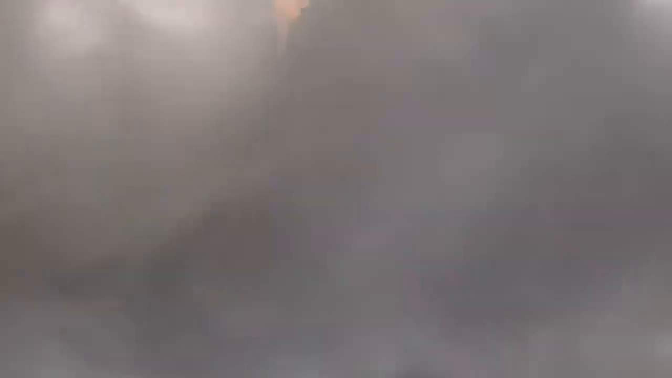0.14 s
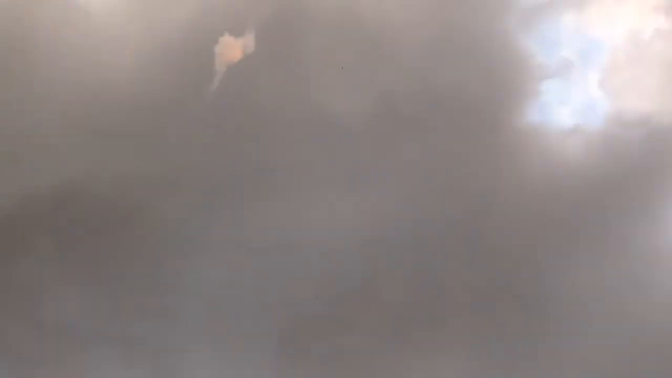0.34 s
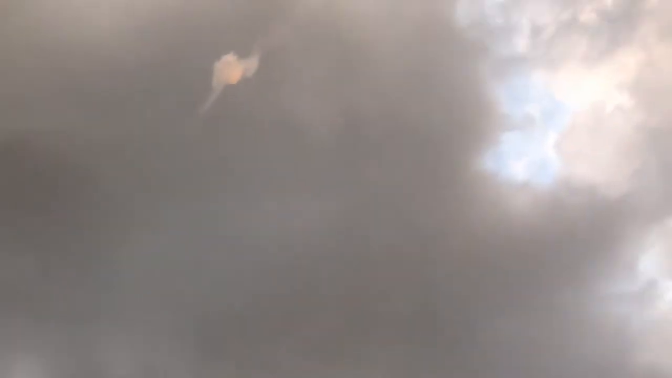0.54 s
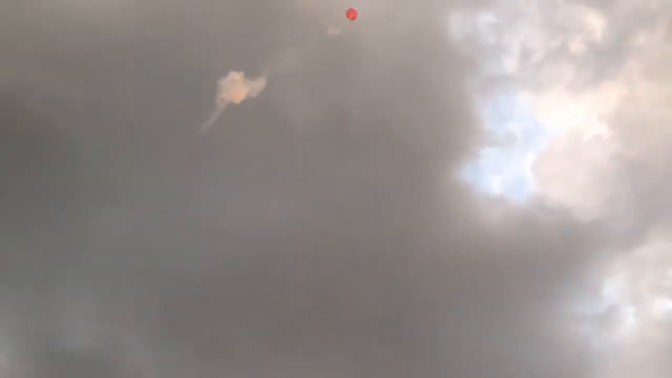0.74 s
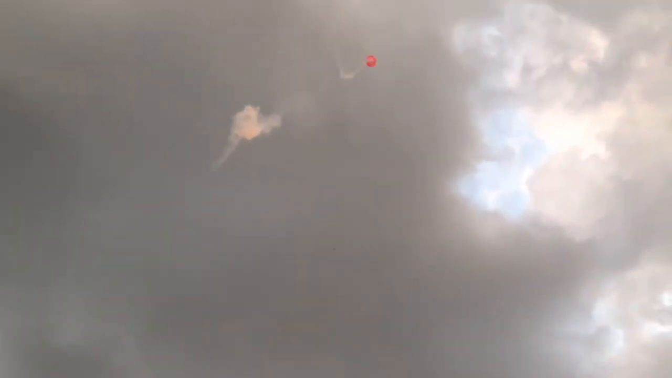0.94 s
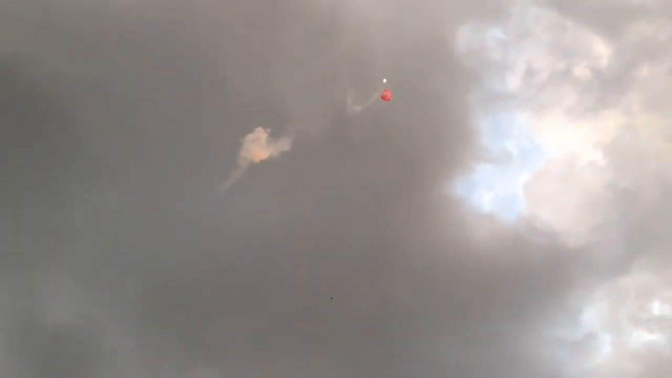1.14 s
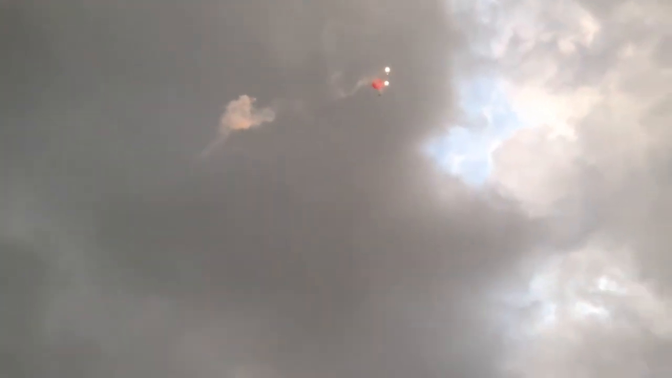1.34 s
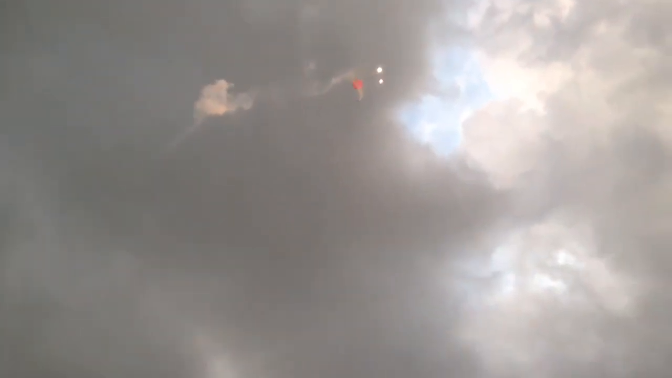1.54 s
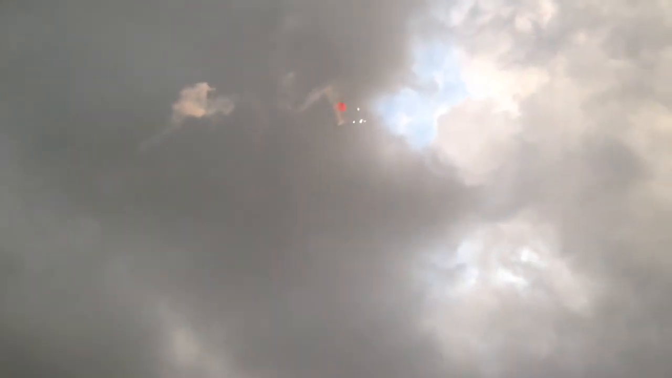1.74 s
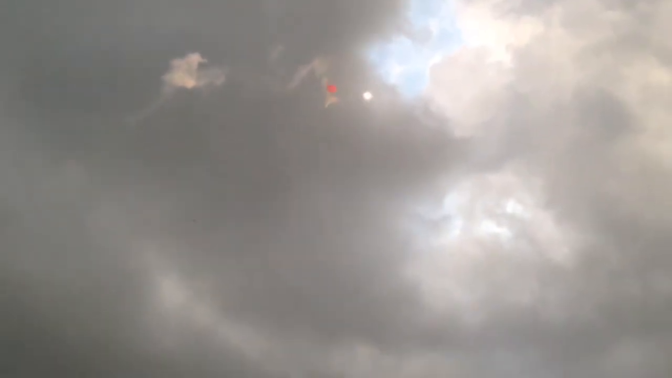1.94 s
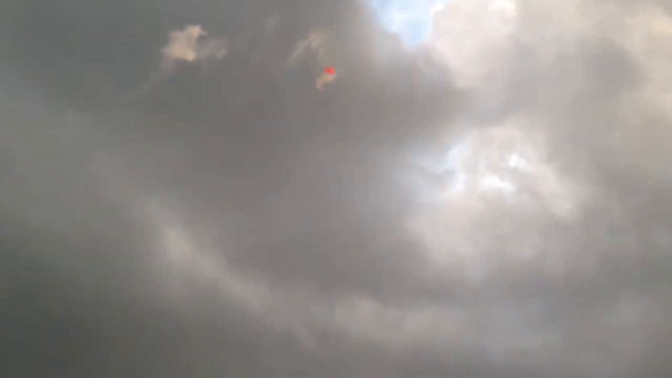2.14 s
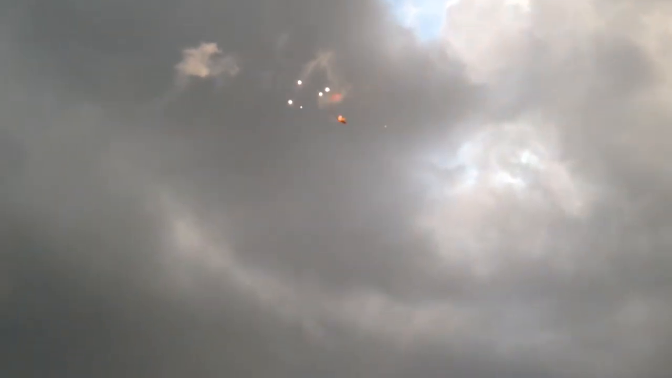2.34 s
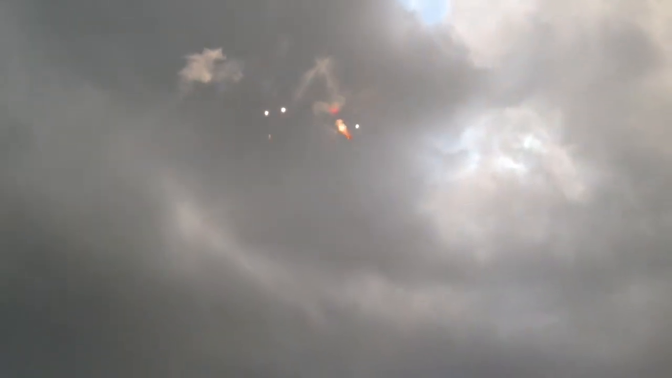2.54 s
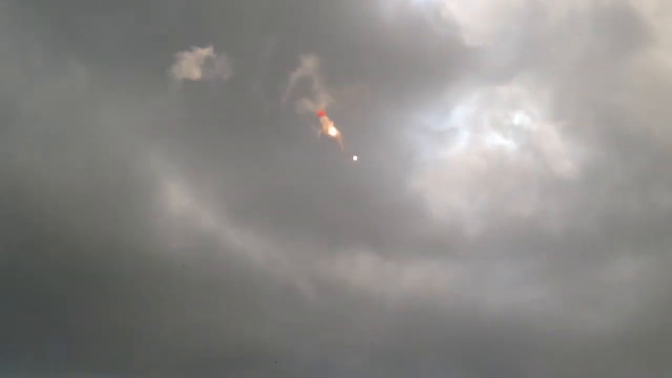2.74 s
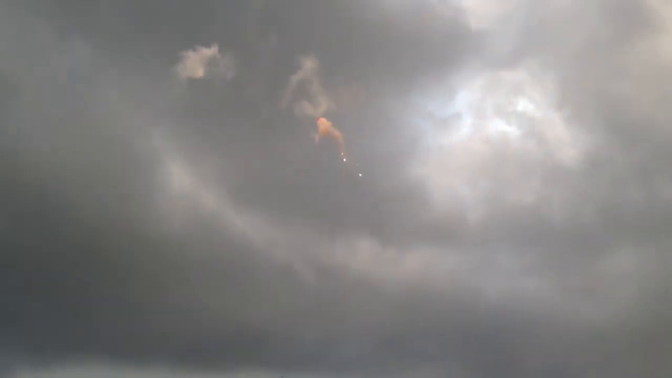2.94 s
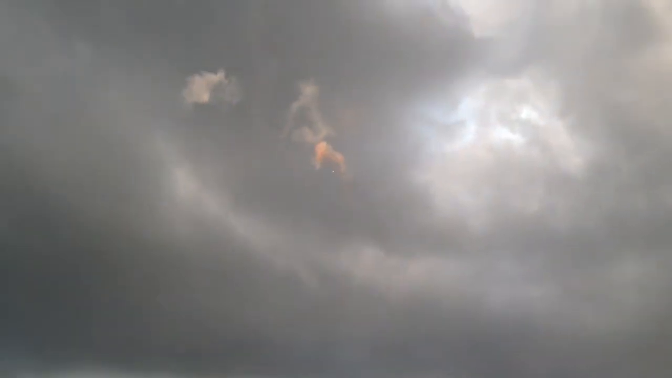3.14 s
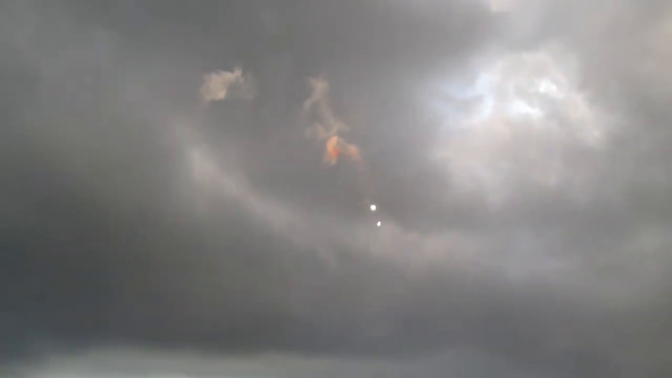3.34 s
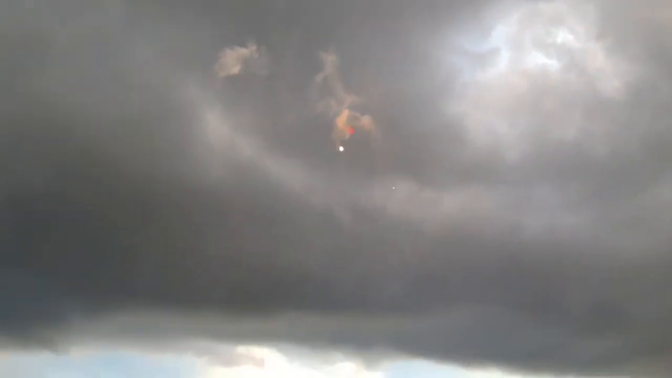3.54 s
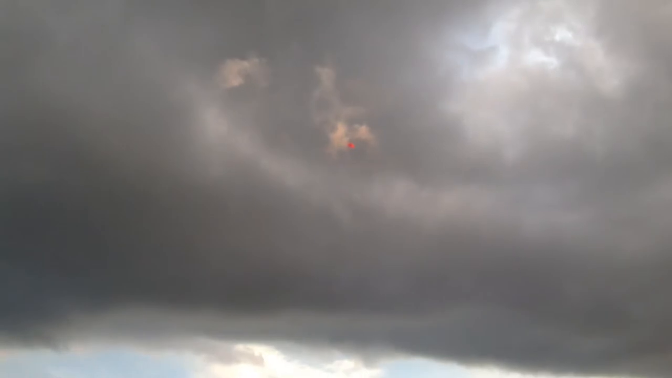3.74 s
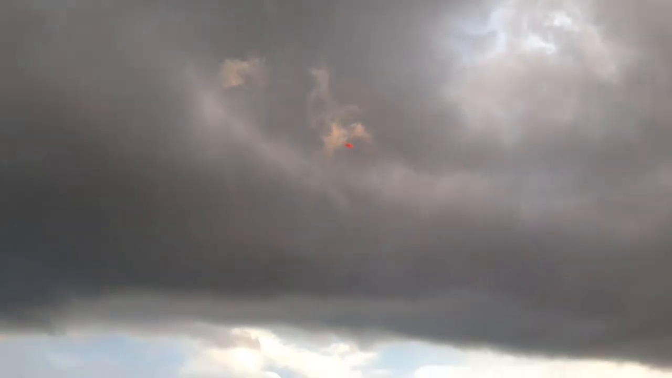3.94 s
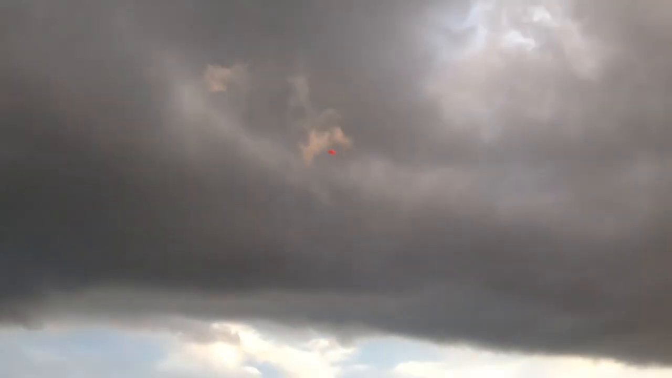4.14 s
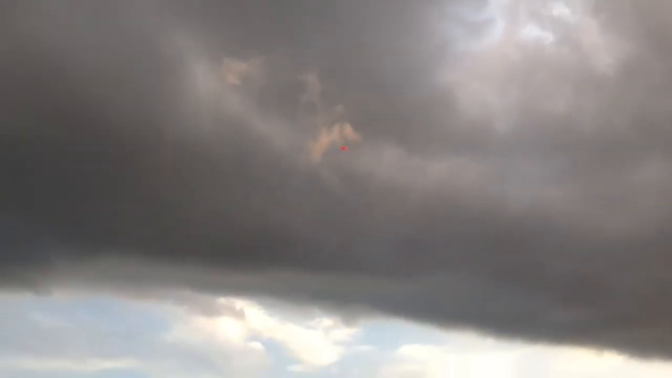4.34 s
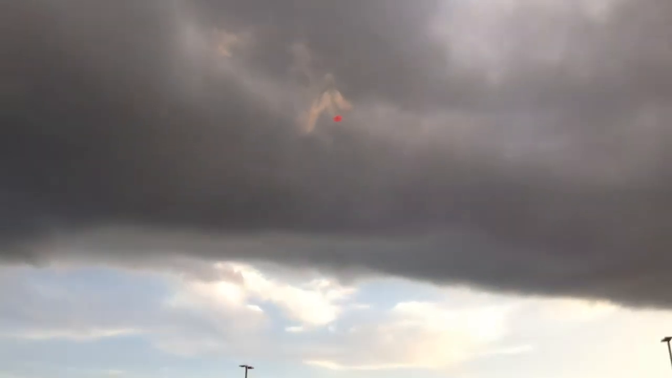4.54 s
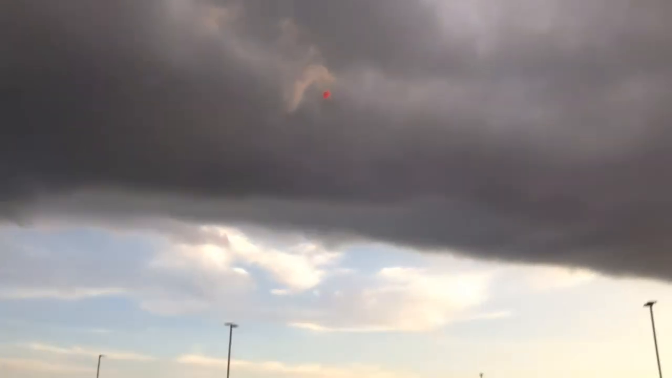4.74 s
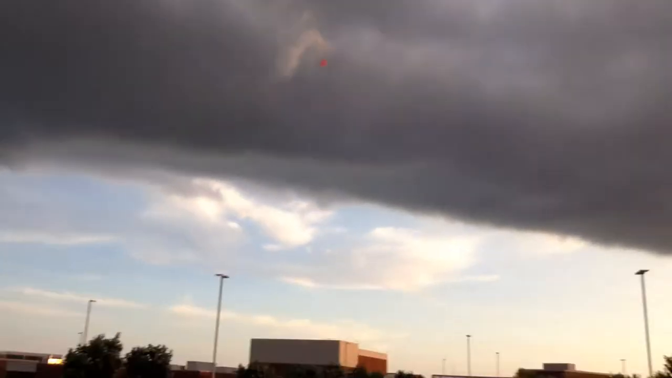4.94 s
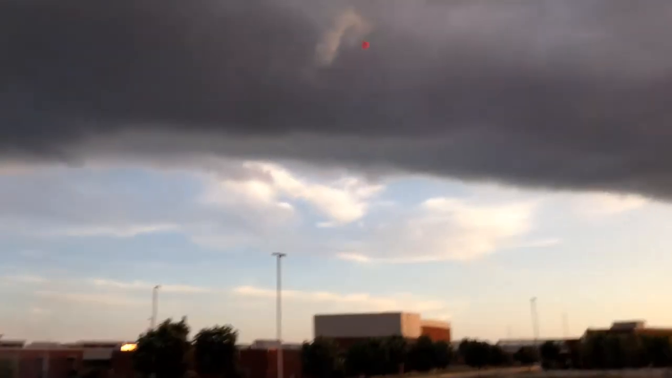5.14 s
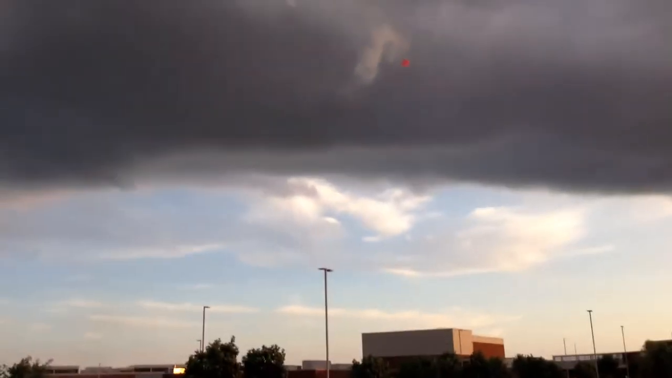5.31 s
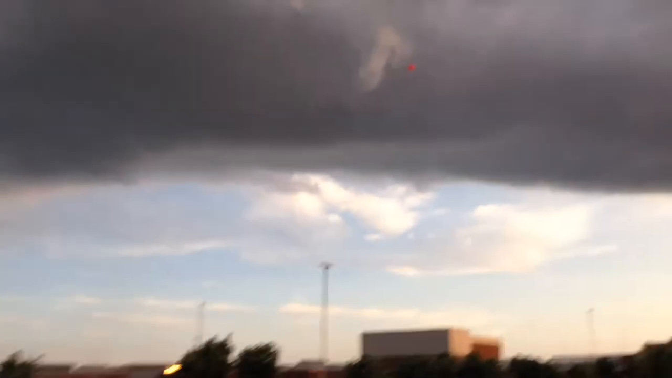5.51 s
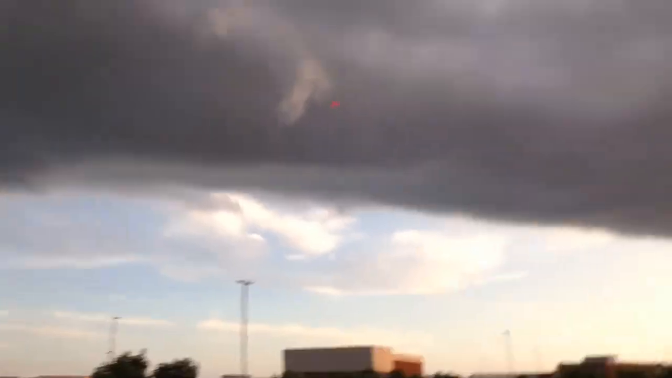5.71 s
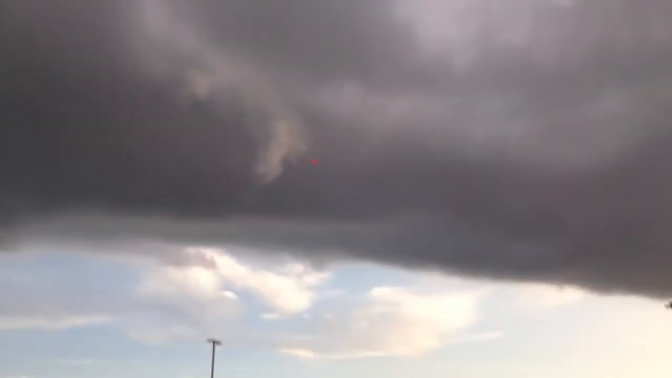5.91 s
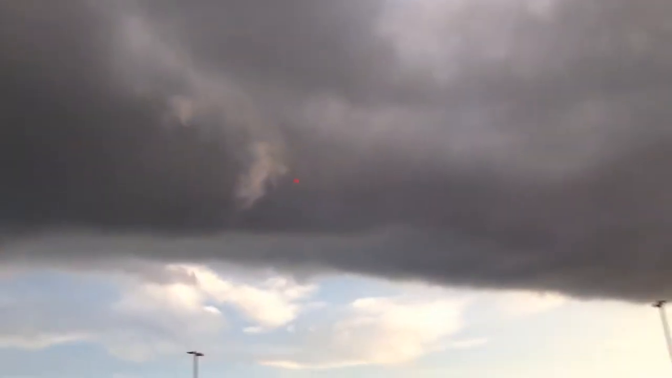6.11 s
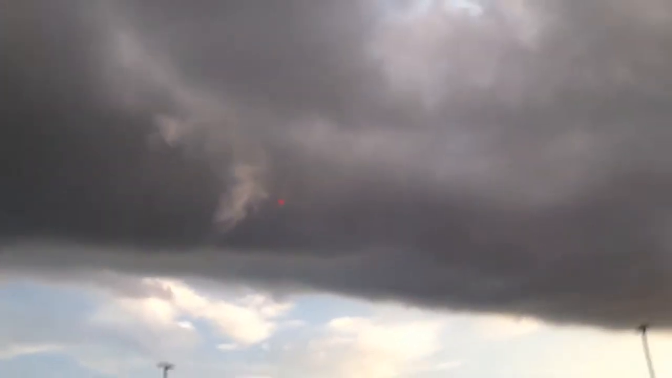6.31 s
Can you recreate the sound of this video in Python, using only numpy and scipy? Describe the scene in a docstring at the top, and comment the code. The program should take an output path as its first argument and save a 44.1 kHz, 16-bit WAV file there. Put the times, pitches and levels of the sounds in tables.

```python
"""A breeze gusts on the microphone over still air with a brief thin hiss, and the first single pops are heard.
A crackling firework star is falling from high in a daytime sky. Leaves stir, a hand rustles, a hollow thing knocks.
The pops thicken into a dense crackle, then thin to stragglers; at the end a dull, distant crackle joins in.
Each pop is a tiny shock wave that arrives directly and again off the ground, and scatters over open land.
Wind, leaves, rustles and air are coloured noise with moving levels; the knock is a few fading tones and a crack."""
import sys
import numpy as np
from scipy import signal
from scipy.fft import rfft, irfft, next_fast_len
from scipy.io import wavfile
from scipy.ndimage import uniform_filter1d, minimum_filter1d

SR = 44100
rng = np.random.default_rng(int(sys.argv[2]) if len(sys.argv) > 2 else 0)


def int16_out(signal):
    """Quantize to a 16-bit WAV file."""
    q = np.round(np.clip(np.atleast_2d(signal).T, -1, 1) * 32767)
    wavfile.write(sys.argv[1], SR, q.astype(np.int16))


N = 280913
TIME = np.arange(N) / SR  # seconds

# how thickly the weak pops swarm: [t/s, rate/(pops per s), mean energy/dB]
WEAK_SWARM = [(1.1, 2, -30), (1.3, 41, -18), (1.8, 47, -25.5), (2.1, 259, -17), (2.5, 292, -11),
              (2.9, 446, -12), (3.23, 510, -19.5), (3.3, 127, -11), (3.45, 55, -14), (3.8, 22, -17),
              (4.3, 15, -27.5), (5.55, 1.75, -38.5)]


def undb(db):
    """Turn decibels into gain."""
    return 10 ** (np.asarray(db) / 20)


def along(table, t):
    """Read the columns of a table at times t, with straight lines between its rows."""
    s, *columns = np.transpose(table)
    return [np.interp(t, s, c) for c in columns]


def shape(points, hz):
    """Read a table of [f/Hz, value] on a log-frequency axis."""
    f, value = np.transpose(points)
    return np.interp(np.log(np.maximum(hz, 1)), np.log(f), value)


def tint(x, colour):
    """Filter a signal to a colour, [f/Hz, level/dB], and scale it to an rms of 1."""
    size = next_fast_len(len(x), True)
    gain = undb(shape(colour, np.fft.rfftfreq(size, 1 / SR)))
    y = irfft(rfft(x, size) * gain, size)[:len(x)]
    return y / np.sqrt(np.mean(y ** 2))


def walk(rate):
    """Wander by chance around 0: random points, `rate` per second, joined by straight lines."""
    knots = rng.standard_normal(1024)
    return np.interp(TIME * rate, np.arange(len(knots)), knots)


def unit(rows):
    """Scale each row to an energy of 1."""
    return rows / np.sqrt(np.sum(rows ** 2, axis=-1, keepdims=True))


def place(times, waves):
    """Add each wave to silence at its own time."""
    out = np.zeros(N + waves.shape[1])
    starts = np.clip(times * SR, 0, N - 1).astype(int)
    for i, wave in zip(starts, waves):
        out[i:i + len(wave)] += wave
    return out[:N]


def swells(rows):
    """Gain over time of smooth bell-shaped swells: [centre t/s, level/dB, half length/s]."""
    return sum(undb(db) * np.exp(-((TIME - s) / length) ** 2) for s, db, length in rows)


def grit(size, spread_db):
    """Dense noise grains of very uneven strength."""
    return rng.standard_normal(size) * undb(spread_db * rng.standard_normal(size))


def air():
    """Still outdoor air: steady soft noise, with a thin high hiss that holds at first, then dies away."""
    # colour of the still air: [f/Hz, level per Hz/dB]
    air_colour = [(30, 2), (70, 5.5), (150, -1.5), (400, -6), (1000, 1), (2000, -5), (5000, -9),
                  (6200, -19.5), (10000, -18), (15000, -29.5)]
    hiss_colour = [(6000, -33.5), (7700, -1), (9200, 1), (11500, -12.5), (14000, -8.5)]
    air_db, hiss_db = -58, -62
    hiss_hold_s, hiss_fade_db_per_s = .17, 90
    calm = tint(rng.standard_normal(N), air_colour) * undb(air_db + 0.56 * walk(5))
    hiss = tint(rng.standard_normal(N), hiss_colour)
    fade_db = hiss_fade_db_per_s * np.maximum(TIME - hiss_hold_s, 0)
    return calm + hiss * undb(hiss_db - fade_db)


def wind():
    """Eddies rumble on the microphone; strong gusts reach higher, and single buffets thump with a rough edge."""
    # the breeze, which mostly dies down: [t/s, level/dB]
    breeze = [(0, -37), (.8, -37), (1.2, -41), (2.1, -42.5), (2.8, -59), (3.5, -62), (4.5, -55.5),
              (6.37, -58)]
    # gusts on top of it: [centre t/s, level/dB, half length/s]
    gusts = [(.02, -30, .05), (.228, -31.5, 0.038), (.38, -33.5, .04), (.585, -27.5, 0.073),
             (.74, -27.5, 0.081), (.9, -31, 0.023), (1.13, -41, 0.02), (1.32, -31.5, 0.051),
             (1.51, -32, 0.017), (1.6, -34.5, .04), (1.86, -40, 0.041), (3.79, -46.5, 0.031),
             (4.62, -44, 0.026), (4.86, -47.5, .025), (5.02, -50, .035), (5.13, -49.5, 0.035),
             (5.25, -44, 0.053), (5.5, -45.5, .03), (6.185, -41, 0.041)]
    # colour of the rumble: [f/Hz, level/dB]
    rumble_colour = [(25, -7.5), (60, -11.5), (100, -7.5), (170, 1.5), (260, -3.5), (400, -19),
                     (700, -31.5), (1500, -50.5), (4000, -65)]
    # single buffets, levels before the mix: [t/s, level/dB, pitch f/Hz]
    buffets = [(.003, -16.5, 280), (0.187, -25, 200), (0.242, -17.5, 230.5), (0.326, -16.5, 193),
               (0.576, -18.5, 260), (.71, -12, 330), (.728, -12, 199), (.755, -15.5, 287),
               (1.035, -21, 204), (1.495, -25, 180), (2.173, -17, 225), (2.309, -19, 235),
               (5.508, -25, 220), (5.789, -32.5, 181), (6.17, -28, 235.1)]
    rush_colour = [(120, -40.0), (330, 7.5), (550, -2.5), (1000, -20.0), (3000, -47.5), (9000, -58)]

    gust_db = 20 * np.log10(np.hypot(undb(along(breeze, TIME)[0]), swells(gusts)))
    rumble = tint(rng.standard_normal(N), rumble_colour) * undb(gust_db - 1.0 + 3.5 * walk(35))
    strength = undb(gust_db - gust_db.max() + 3.3 * walk(45))
    rush = tint(rng.standard_normal(N), rush_colour)

    times, db, hz = np.transpose(buffets)[:, :, None]
    cycles = hz * TIME[:SR // 16]
    swell = cycles / 0.49  # the push peaks after about half a cycle
    push = undb(db) * swell * np.exp(1 - swell)
    thumps = place(times[:, 0], push * np.sin(2 * np.pi * cycles))
    edge = undb(-17.5) * place(times[:, 0], push)
    # the power above 1 makes the rush stand out in strong gusts
    rush_gain = undb(-35) * strength ** 1.85 + edge
    return rumble + rush_gain * rush + undb(-2.5) * thumps


def shocks(colour, tilt_db, size=512):
    """Tiny shock waves that start sharply, with their energy up front; each has its own tilt in dB per octave."""
    hz = np.fft.rfftfreq(size, 1 / SR)
    octaves = np.log2(np.maximum(hz, 700) / 3000)  # the tilt turns about 3 kHz and stops below 700 Hz
    db = shape(colour, hz) + tilt_db[:, None] * octaves
    cepstrum = irfft(np.log(undb(db)))
    cepstrum[:, 1:size // 2] *= 2  # folding puts no sound before the start of the wave
    cepstrum[:, size // 2 + 1:] = 0
    return unit(irfft(np.exp(rfft(cepstrum))))


def flutter(colour, count, t60, size=1536):
    """Short bursts of tiny reflections, different for each pop; t60 is the time to fade by 60 dB, in s."""
    noise = tint(rng.standard_normal(count * size), colour).reshape(count, size)
    return unit(noise * undb(-60 * np.arange(size) / SR / t60))


def pops(times, db, flutter_db, t60):
    """Shock waves, no two equally bright, each trailed by its flutter."""
    # colour of a pop: [f/Hz, level/dB]
    pop_colour = [(40, -29.5), (150, -19.5), (450, -8.5), (1000, -5), (2000, -0.5), (3000, -2), (4400, 0.5),
                  (7000, -3.5), (8000, -6.5), (9800, -4), (12500, -10), (15000, -21), (16500, -42)]
    # colour of the flutter behind it: [f/Hz, level/dB]
    flutter_colour = [(60, -27.5), (300, -6.5), (800, -2.5), (1800, 7.5), (3200, 1.5), (6500, 1),
                      (10000, -1), (15000, -10.5)]
    # pops grow duller as the stars fall; the last small ones are thin and bright: [t/s, tilt/(dB per octave)]
    brightness = [(.5, 3.5), (1.15, .5), (1.5, 0), (4.3, -0.03), (4.6, 2), (5.5, 2.5)]
    size = undb(db)[:, None]
    tilt_db = along(brightness, times)[0] + 0.99 * rng.standard_normal(len(times))
    spikes = place(times, size * shocks(pop_colour, tilt_db))
    trails = place(times, size * flutter(flutter_colour, len(times), t60))
    return spikes + undb(flutter_db) * trails


def firework():
    """Loud and weak pops, each heard directly and once more off the ground, which takes a longer path."""
    # pops that stand out, alone or above the crackle, before the mix: [t/s, energy/dB]
    loud_pops = [(.1458, -22.5), (.3774, -8.5), (.5066, -22), (.5348, -10.5), (.547, -14), (.5576, -10),
                 (.6099, 2.5), (.6125, 7), (.7209, 0.5), (.7675, 2), (.9094, 6), (.9403, 3.5), (1.1091, -7),
                 (1.1189, -3.5), (1.1553, 1), (1.1814, 1), (1.2145, 4), (1.2173, 4.5), (1.241, -9),
                 (1.2641, 6), (1.2797, -2), (1.2933, -1.5), (1.2947, 9), (1.3239, 8), (1.3364, 0.5),
                 (1.3441, 10), (1.3886, 4), (1.433, 4), (1.442, 8), (1.4445, 1.5), (1.4508, 3.5),
                 (1.485, -2), (1.518, 4.5), (1.5408, 2.5), (1.5454, 15), (1.5523, 2.5), (1.5633, 2.5),
                 (1.5865, 8.5), (1.5957, 4), (1.5987, 6.5), (1.6088, 14), (1.6188, 10), (1.6253, 8.5),
                 (1.6377, 8.5), (1.675, 1.5), (1.6805, 2.5), (1.7165, -4.5), (1.7603, 6), (1.7629, 7),
                 (1.785, -3), (1.7913, 1.5), (1.8366, 1.5), (1.8402, 8), (1.8581, 2.5), (1.8666, 1.5),
                 (1.8828, 1), (1.8997, 6), (1.9183, 6), (1.9479, 9.5), (1.9698, 9), (1.9772, 6),
                 (2.0017, 6.5), (2.0371, 10.5), (2.0658, 4), (2.1033, 10), (2.1168, 10.5), (2.1182, 8.5),
                 (2.1211, 6), (2.1448, 10), (2.1598, 9), (2.1692, 7.5), (2.1853, 8.5), (2.1971, 7),
                 (2.2516, 4.5), (2.2737, 6.5), (2.2841, 10.5), (2.2897, 11), (2.3079, 11), (2.3552, 9.5),
                 (2.3699, 8.5), (2.3936, 4.5), (2.4377, 10.5), (2.4588, 11.5), (2.5213, 3), (2.5621, 5),
                 (2.567, 5), (2.5977, 6.5), (2.6062, 7), (2.6117, 8.5), (2.6517, 6.5), (2.7412, 7.5),
                 (2.7494, 4), (2.8159, 6.5), (2.8283, 9), (2.8407, 17), (2.9013, 17), (2.905, 8.5),
                 (2.9085, 11.5), (2.9205, 9), (2.9313, 7), (2.9571, 11), (2.9614, 4), (2.9687, 4),
                 (3.0344, 11), (3.0522, 9), (3.0867, 5.5), (3.0911, 6.5), (3.1193, 9), (3.1581, 4),
                 (3.1609, 1.5), (3.1677, 17), (3.1701, 11.5), (3.1741, 8), (3.1812, 6.5), (3.1977, 15),
                 (3.2314, 8.5), (3.2439, 8.5), (3.2488, 9.5), (3.2588, 6.5), (3.2884, 6.5), (3.293, -2.5),
                 (3.3092, 6), (3.3248, 9.5), (3.3281, 6), (3.3309, 13.5), (3.3332, 10), (3.336, 6.5),
                 (3.3543, 4.5), (3.3777, -7), (3.4182, -.5), (3.4317, 7.5), (3.4447, -7), (3.4683, 4.5),
                 (3.4755, 7.5), (3.4784, 1), (3.4897, -1), (3.5453, -1), (3.6196, 0.5), (3.6477, 3),
                 (3.6524, 4), (3.6694, 7.5), (3.701, 7), (3.7142, 3.5), (3.7501, 12), (3.7671, -2.5),
                 (3.8311, 5.5), (3.9357, 6), (4.0882, 8.5), (4.3018, 2), (4.5178, 3), (4.5699, -18),
                 (4.7997, -26.5), (5.0326, -20), (5.1493, -30), (5.2132, -19.5), (5.2852, -18),
                 (5.3197, -15), (5.4297, -14), (5.4865, -21)]
    # bounce off the ground, mostly sooner as the stars sink: [t/s, delay/s, level/dB]
    ground = [(.6, .011, -15.5), (1.2, .011, -6), (2.2, 0.0087, -7), (3.0, 0.0078, -6), (3.6, 0.006, -6.5),
              (4.3, .0053, -1.5), (4.52, .0038, -3), (5.3, 0.0038, -14)]

    rate, mean_db = along(WEAK_SWARM, TIME)
    weak = np.flatnonzero(rng.random(N) < rate / SR)
    weak_db = mean_db[weak] + 5.0 * rng.standard_normal(len(weak))
    weak_pops = np.column_stack([TIME[weak], weak_db])
    times, db = np.vstack([loud_pops, burst(), weak_pops]).T
    # each pop falls a tiny random step off its listed time, so the timing stays irregular
    times = times + 4e-5 * rng.standard_normal(len(times))

    delay, bounce_db = along(ground, times)
    # in the thick of it the stars are spread out, so their bounces differ
    crowding = along(WEAK_SWARM, times)[0] / rate.max()
    delay = delay * (1 + .06 * crowding * rng.standard_normal(len(times)))
    direct = pops(times, db, flutter_db=-10.5, t60=0.0085)
    bounce = pops(times + delay, db + bounce_db, flutter_db=-8.5, t60=0.012)
    # rough ground swallows the top
    dull_bounce = signal.lfilter(*signal.butter(2, 7200, fs=SR), bounce)
    return undb(0.64) * direct + undb(1.5) * dull_bounce


def land(x, wet_db):
    """Grainy scatter from lots and buildings: a noise tail whose bands each fade at their own pace."""
    # bands of the scatter, t60 being the time to fade by 60 dB: [centre f/Hz, level/dB, t60/s]
    scatter_bands = [(250, -16, 1.5), (693, 2.5, 2.0), (1500, -6, 5), (3040, -3, 5), (4800, -1, 3.57),
                     (6550, 1, 2.8), (8500, 5.5, 1.4), (13000, -3, 1.9)]
    t = TIME[:3 * SR]
    hz = np.fft.rfftfreq(len(t), 1 / SR)
    grains = rfft(grit(len(t), spread_db=4))
    centres = np.transpose(scatter_bands)[0]
    tail = 0
    # each band's share is 1 at its own centre and 0 at its neighbours'
    for (_, db, t60), share in zip(scatter_bands, np.eye(len(scatter_bands))):
        band = irfft(grains * shape(np.column_stack([centres, share]), hz))
        tail = tail + band * undb(db - 60 * t / t60)
    return signal.fftconvolve(x, undb(wet_db) * unit(tail))[:N]


def fizz(crackle):
    """Where the pops crowd together, countless tiny grains burn with them and merge."""
    colour = [(150, -23.5), (500, -9), (1000, -3.5), (1800, -3.0), (3000, -2.5), (5000, -4.5),
              (7000, -1.5), (9000, -10.0), (15000, -11)]
    rate = along(WEAK_SWARM, TIME)[0]
    # strength of the crackle over 1/80 s
    activity = np.sqrt(np.abs(uniform_filter1d(crackle ** 2, size=SR // 80)))
    grains = tint(grit(N, spread_db=6.0), colour)
    return undb(-13.5) * activity * (rate / rate.max()) ** .5 * grains


def leaves():
    """Leaves stirred by the first gusts: uneven noise grains in one soft papery swell."""
    colour = [(200, 1.0), (800, 7), (1500, 6.0), (3000, -18.0), (6000, -25.5), (14000, -22.0)]
    centre_s, level_db, half_length_s = 0.47, -54.5, 0.17
    swell = swells([(centre_s, level_db, half_length_s)])
    return swell * undb(2 * walk(24.3)) * tint(grit(N, spread_db=6), colour)


def rustle():
    """The hand that holds the phone rustles softly: fine bright friction grains in short swells."""
    # the rustles: [centre t/s, level/dB, half length/s]
    hand_moves = [(0.564, -40, 0.012), (.78, -56, 0.057), (4.615, -46, 0.032), (5.273, -59, 0.049),
                  (5.434, -57, 0.054), (6.167, -48, 0.01)]
    # their colour: [f/Hz, level/dB]
    friction_colour = [(200, -13), (1000, -14), (4000, 5), (6500, -1.5), (9500, -3), (12500, -9),
                       (16000, -20)]
    return swells(hand_moves) * tint(grit(N, spread_db=7.5), friction_colour)


def knock():
    """A hollow thing near by is struck once: a short crack of noise and a brief ring of fading tones."""
    # what it rings with, t60 being the time to fade by 60 dB: [f/Hz, level/dB, t60/s]
    modes = [(542, 2, 0.064), (723, -6, .015), (1080, -19, 0.017), (1518, -6, 0.016), (1600, -11, 0.031)]
    crack_colour = [(250, -13.5), (800, 6), (1800, -1), (3000, -9), (5000, -12), (9000, -17), (15000, -30)]
    knock_s, knock_db = .8668, -16.5
    t = TIME[:SR // 5]
    ring = sum(undb(db - 60 * t / t60) * np.sin(2 * np.pi * hz * t) for hz, db, t60 in modes)
    crack = tint(rng.standard_normal(len(t)), crack_colour) * undb(-3.5 - 60 * t / 0.019)
    return undb(knock_db) * place(np.array([knock_s]), (ring + crack)[None])


def burst():
    """Strong pops at uneven gaps, ever faster as the fire spreads through the star: rows [t/s, energy/dB]."""
    # the height of the burn, when full-strength pops come too fast to tell apart
    start_s, end_s = 1.9, 3.26
    first_per_s, last_per_s = 45, 80
    mean_db, spread_db = 2.2, 3.0
    rate = np.interp(TIME, [start_s, end_s], [first_per_s, last_per_s], left=0, right=0)
    burnt = np.cumsum(rate) / SR  # number of pops due so far
    late, strength = rng.standard_normal((int(burnt[-1]), 2)).T
    turn = np.clip(np.arange(len(late)) + .5 + .7 * late, .5, burnt[-1] - .5)
    times = TIME[np.searchsorted(burnt, turn)]
    return np.column_stack([times, mean_db + spread_db * strength])


def far_crackle():
    """Pops dulled and smeared by distance, each in a patter of weaker ones that builds and fades."""
    # distant pops, before the mix: [t/s, energy/dB]
    distant_pops = [(5.184, -15), (5.194, -11.5), (5.316, -16.5), (5.43, -17.5), (5.524, -18), (5.541, -15),
                    (5.661, -15), (5.856, -21.5), (5.873, -23), (5.878, -13), (5.901, -35), (5.963, -14),
                    (6.162, -15.5), (6.174, -19), (6.193, -15), (6.303, -13)]
    # their dull colour: [f/Hz, level/dB]
    distant_colour = [(100, -22), (350, 1), (700, 4.5), (1900, -4.5), (2800, -17.5), (5000, -25),
                      (9000, -40), (15000, -40)]
    patter_db, build_s, fade_s = -36.5, 0.029, 0.099
    times, db = np.transpose(distant_pops)
    size = undb(db)[:, None]
    spikes = place(times, size * shocks(distant_colour, 0.53 * rng.standard_normal(len(times))))
    smear = place(times, size * flutter(distant_colour, len(times), t60=0.027))

    # about 600 grains per second over a faint steady noise
    grains = (rng.random(N) < 600 / SR) * grit(N, spread_db=3.5) + undb(-23) * rng.standard_normal(N)
    since = TIME - times[:, None]
    activity = np.max(size * np.exp(-np.maximum(since / fade_s, -since / build_s)), axis=0)
    patter = undb(patter_db) * activity * tint(grains, distant_colour)
    return undb(-5.0) * spikes + undb(-4.0) * smear + patter


def scene():
    """The firework and its wavering scatter over open land, with wind, small sounds and a distant crackle."""
    around = air() + wind() + leaves() + rustle() + knock() + far_crackle()
    crackle = firework()
    scatter = undb(1.0 * walk(14)) * land(crackle, wet_db=-22.5)
    return (crackle + fizz(crackle) + scatter + around)[None]


def record(dry):
    """A fast limiter catches the biggest spikes and the rest of their tips clip; deep bass and top are cut."""
    needed = np.minimum(1, 1.15 / (np.abs(dry) + 1e-9))
    gain = uniform_filter1d(minimum_filter1d(needed, size=41), size=21)
    clipped = np.clip(gain * dry, -.88, .88)
    thinned = signal.sosfilt(signal.butter(2, 115, "high", fs=SR, output="sos"), clipped)
    low_pass = signal.firwin(151, 15400, fs=SR)
    return signal.fftconvolve(thinned, low_pass[None], mode="same")


dry = scene()
out = record(dry)
int16_out(out)
```